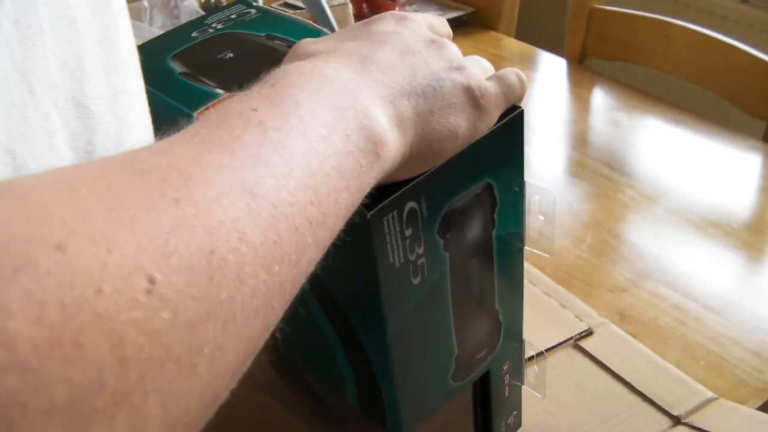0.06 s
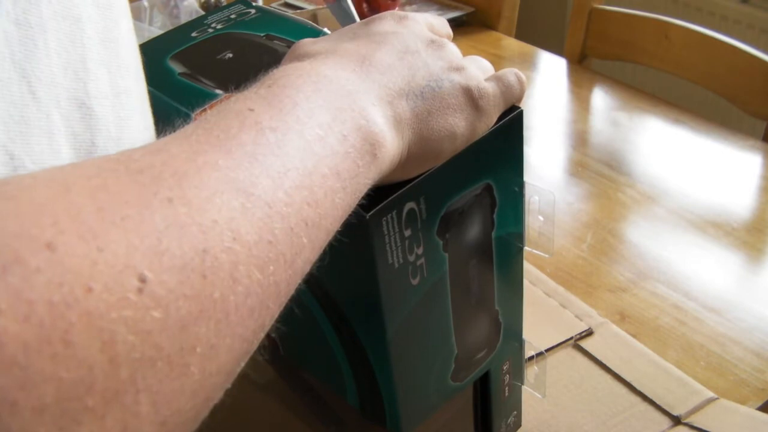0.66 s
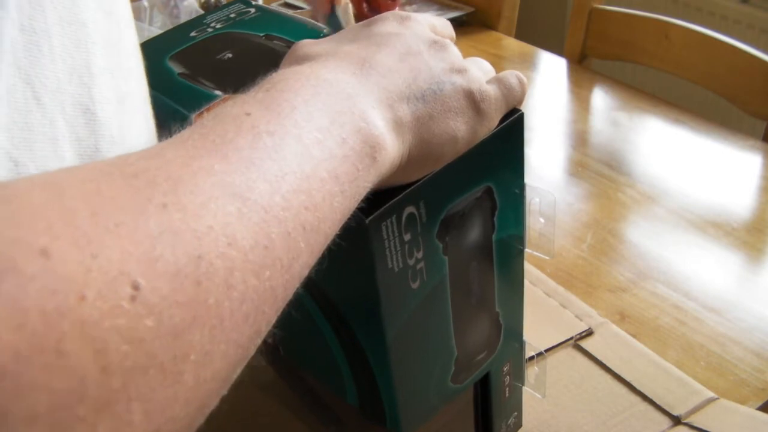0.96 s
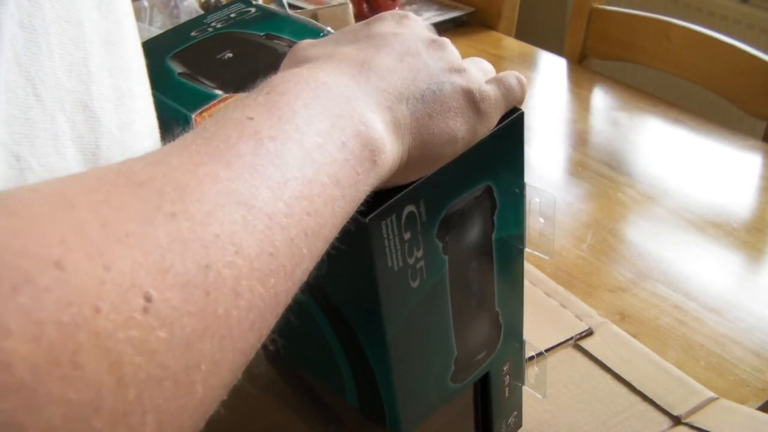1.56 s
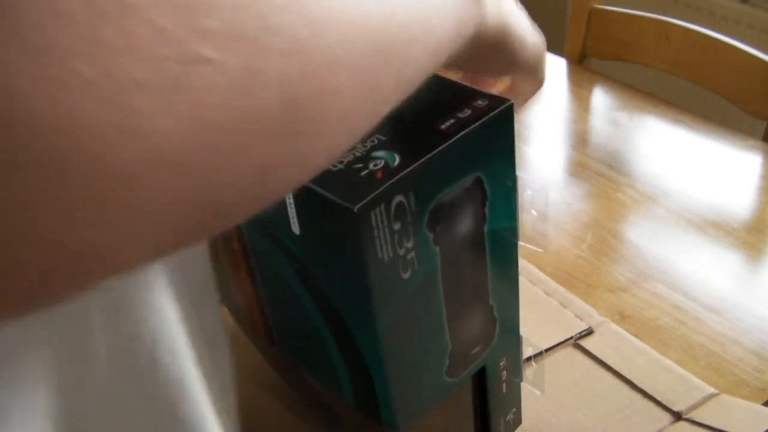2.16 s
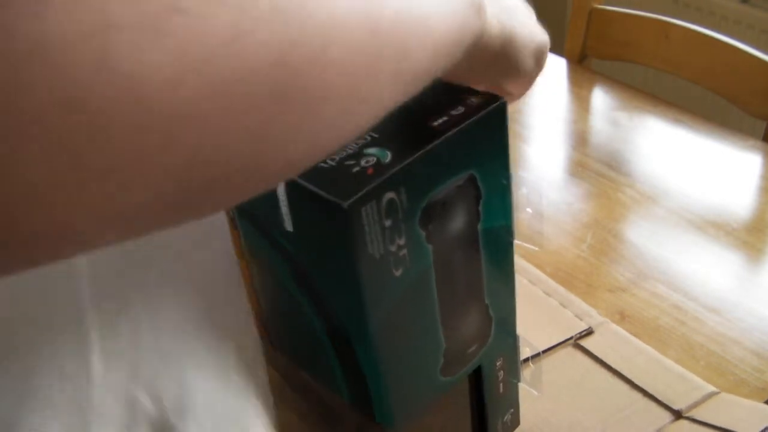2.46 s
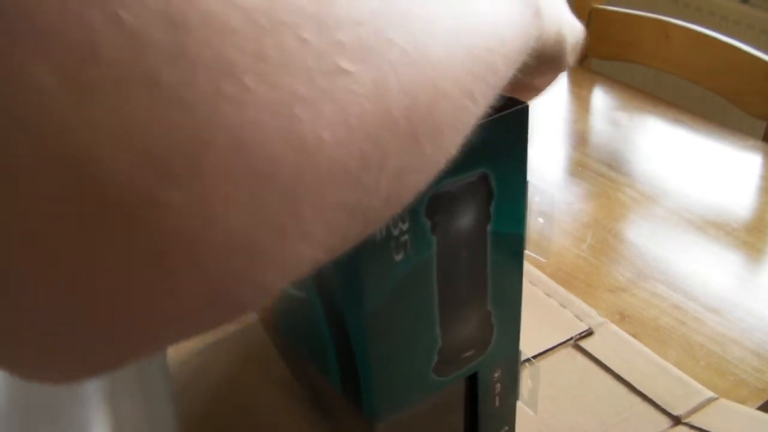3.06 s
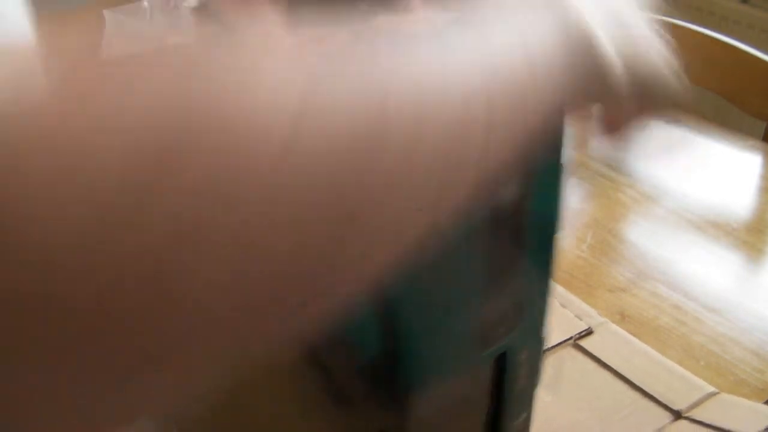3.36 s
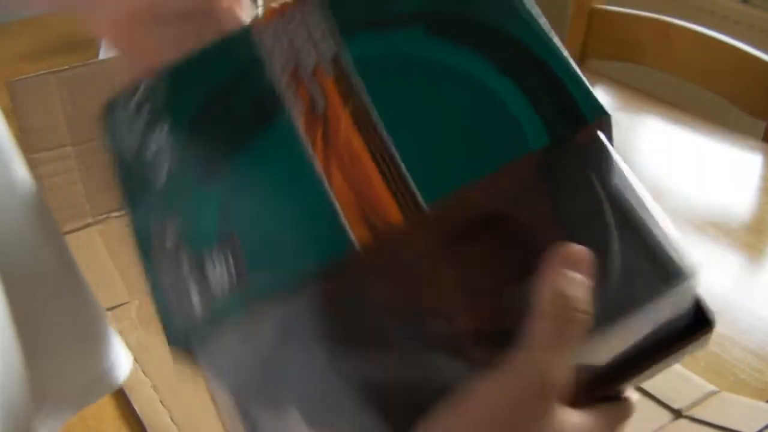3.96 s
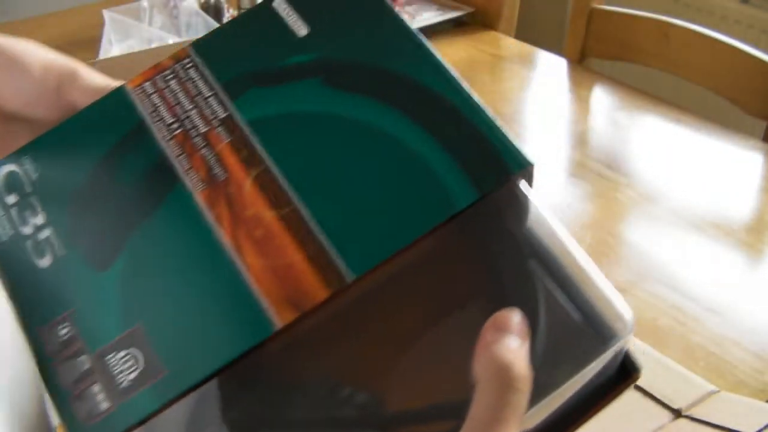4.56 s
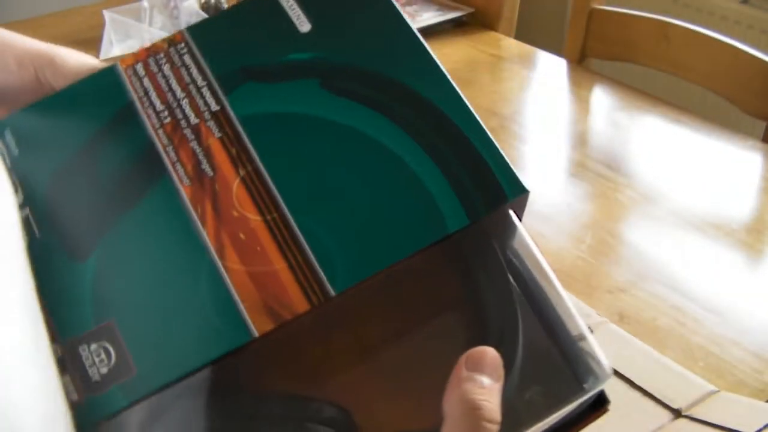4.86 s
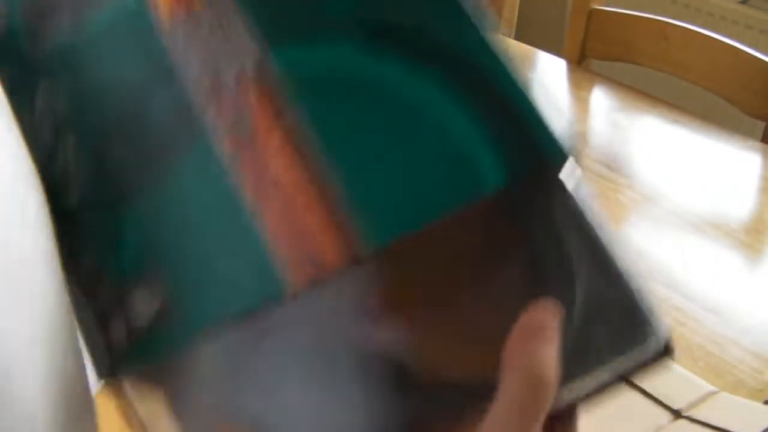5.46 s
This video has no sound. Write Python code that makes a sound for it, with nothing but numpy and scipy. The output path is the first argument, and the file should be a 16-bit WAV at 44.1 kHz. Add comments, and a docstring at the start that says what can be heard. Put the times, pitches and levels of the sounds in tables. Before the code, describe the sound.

A cardboard box with a plastic tray inside is handled close to the microphone in a small, quiet room. It starts with a few faint ticks. At about 0.8 seconds the tray comes loose with a short rasp, followed by soft rubbing and scattered catches of card. Around 2.2 seconds the hollow box knocks hard and thumps on a wooden table, with a quick clatter, a scrape and a sharp plastic snap. A lighter bump comes at 2.9 seconds. From 3 to 4.8 seconds the hands push on in short strokes, the sleeve rubbing with a hollow tone while the plastic clicks and buckles. At about 5 seconds the box knocks hard again, with a bright scrape and a low thump from the table. Two last, softer pushes rub along at about 5.2 and 5.5 seconds.

```python
"""A wooden table in a small room, stereo pair close in: a plastic tray is worked out of its card sleeve.
Light ticks come first; each contact booms the hollow box, claps its panels, cracks its folds and snaps its
edges. Near 0.8 s the tray rasps free, and the hands push on in short strokes, the sleeve rubbing and
catching, the plastic buckling. The box knocks hard and thumps the table around 2.2 s, more lightly at
2.9 s and hard again at 5 s, before two last pushes."""
import sys
import numpy as np
from scipy import signal
from scipy.fft import rfft, irfft, next_fast_len
from scipy.io import wavfile

SR = 44100
rng = np.random.default_rng(int(sys.argv[2]) if len(sys.argv) > 2 else 0)


def log_audio(samples):
    """Write samples as a 16-bit WAV file to the path given in sys.argv[1]."""
    # one column per channel
    frames = np.atleast_2d(samples).T
    # limit to full scale, then quantise
    limited = np.clip(frames, -1, 1)
    pcm = np.round(limited * 32767).astype(np.int16)
    wavfile.write(sys.argv[1], SR, pcm)


N = 243431
TIME = np.arange(N) / SR
# the hands' light, creeping grip between pushes, let go when they shift: t/s, body level/dB
GRIP = [(0.68, -85), (0.79, -54), (1.12, -57.5), (1.25, -53.5), (1.46, -51), (1.56, -59), (1.65, -55),
        (2.9, -50), (3.21, -56.5), (3.55, -49.5), (3.66, -54.5), (3.9, -48), (4.8, -56), (4.88, -50.5),
        (5.5, -49)]


def from_db(db):
    return 10 ** (np.asarray(db) / 20)


def rms(x):
    return np.sqrt(np.mean(x ** 2) + 1e-20)


def in_time(rows):
    """A (t/s, value) curve, sample by sample."""
    return np.interp(TIME, *np.transpose(rows))


def at_hz(rows, hz, column=1):
    """One column of a frequency table, read on a log axis."""
    rows = np.array(rows)
    return np.interp(np.log(np.maximum(hz, 1)), np.log(rows[:, 0]), rows[:, column])


def filtered(x, kind, hz, order=2):
    return signal.sosfilt(signal.butter(order, hz, kind, fs=SR, output="sos"), x)


def coloured(x, spectrum):
    """Gives a signal the colour of a (f/Hz, level/dB) table."""
    return irfft(rfft(x) * from_db(at_hz(spectrum, np.fft.rfftfreq(len(x), 1 / SR))), len(x))


def noise(spectrum):
    """Coloured noise of rms 1."""
    x = coloured(rng.standard_normal(next_fast_len(N)), spectrum)[:N]
    return x / rms(x)


def drift(turns_per_s):
    """Random wander of spread near 1."""
    return np.interp(TIME * turns_per_s, np.arange(N), rng.standard_normal(N))


def resonances(force, modes):
    """Broad resonances in parallel, signs alternating."""
    out = 0
    for k, (hz, width, db) in enumerate(modes):
        r = np.exp(-np.pi * width / SR)
        poles = [1, -2 * r * np.cos(2 * np.pi * hz / SR), r * r]
        gain = (-1) ** k * from_db(db) * (1 - r * r) / 2
        out = out + gain * signal.lfilter([1, 0, -1], poles, force + 1e-18)
    return out


def ring(force, modes, spread_db, detune):
    """Damped modes; the grip and the place of contact weight and shift each one at random."""
    out = 0
    for (hz, db, t60), (weight, shift) in zip(modes, rng.standard_normal((len(modes), 2))):
        r = from_db(-60 / (t60 * SR))
        poles = [1, -2 * r * np.cos(2 * np.pi * hz * (1 + detune * shift) / SR), r * r]
        out = out + from_db(db + spread_db * weight) * signal.lfilter([1, -1], poles, force + 1e-18)
    return out


def room_tone():
    """Still air: a central part, and a diffuse part that differs between the microphones."""
    # spectrum of the air: f/Hz, level per Hz/dB
    air = [(25, -34), (55, -13.5), (100, 3.5), (160, -22), (260, -12), (400, 5), (600, -7.5), (800, -7),
           (1500, -15.5), (4500, -18.5), (12000, -21.5)]
    return from_db(-63) * noise(air), from_db(-67.5) * filtered(noise(air), "low", 4000, order=4)


def thuds(gain):
    """The box shifts on the table in low lumps and is never quite still."""
    # spectrum of the thuds: f/Hz, level per Hz/dB
    spectrum = [(30, -20), (60, -10), (100, -2.5), (145, 0), (190, 6), (240, -17), (330, -20)]
    lumps = from_db(4 + 4 * drift(28))
    return np.hypot(gain, from_db(-73.5)) * lumps * noise(spectrum)


def body(force):
    """The hollow box booms and radiates little outside its modes."""
    # modes of the box: f/Hz, level/dB, t60/s
    modes = [(339.5, -14, 0.1), (368.6, -8.5, 0.13), (402.8, -3.5, 0.34), (418.5, 6, 0.11),
             (454.3, 7, 0.16), (462.3, -21, 0.22), (562, -21.5, 0.16)]
    return filtered(ring(force, modes, spread_db=6, detune=0.02), "band", [210, 950])


def panels(force):
    """Card panels clap in the middle range."""
    # panel resonances: f/Hz, width/Hz, level/dB
    modes = [(690, 56, 1.5), (724, 90, 3), (883, 107, -3), (951, 10.7, -1), (1055, 156, -9.5),
             (1193, 32.5, -1.5), (1288, 274, -9.5)]
    return filtered(resonances(force, modes), "band", [480, 2200])


def folds(force):
    """Stiff, creased card cracks an octave above the panels."""
    # fold resonances: f/Hz, width/Hz, level/dB
    modes = [(1415, 530, -1.5), (2050, 1080, 1), (2450, 256, 7), (2850, 1120, -3.5)]
    return filtered(resonances(force, modes), "band", [1150, 4200])


def edges(force, db_per_octave=0):
    """Small stiff parts radiate only treble."""
    # resonances of edges and plastic film: f/Hz, width/Hz, level/dB
    modes = [(3620, 1040, -0.5), (4190, 1190, 6.5), (6400, 2700, 1.5), (10240, 4300, -3.5)]
    tilted = [(hz, width, db + db_per_octave * np.log2(hz / modes[0][0])) for hz, width, db in modes]
    return filtered(resonances(force, tilted), "high", 2800, order=3)


def contacts(events, trims_db, first_touch, scuff_db, t60_scale, rough_db):
    """Each contact scuffs, hits and chatters away; trims_db sets body, panels, folds and edges."""
    lead, onset = SR // 200, SR // 40
    t = (np.arange(SR // 3) - lead) / SR
    out = np.zeros(N + len(t))
    for s, body_db, panel_db, edge_db, t60 in events:
        at = round(s * SR) - lead
        chatter = from_db(-60 * np.maximum(t, 0) / max(t60 * t60_scale, .004))
        envelope = np.where(t < 0, from_db(scuff_db) * (1 - t / t[0]), chatter)
        tilt = np.clip(-3.5 * (edge_db - panel_db), -6.5, 0)   # edges louder than the panels lose some top
        parts = body, panels, folds, lambda force: edges(force, tilt)
        levels = body_db, panel_db, (panel_db + edge_db) / 2, edge_db
        for part, db, trim_db in zip(parts, levels, trims_db):
            grain, size = rng.standard_normal((2, len(t)))
            force = envelope * grain * from_db(rough_db * size)
            force[lead] += first_touch * np.linalg.norm(force)
            sound = part(force)
            out[at:at + len(t)] += from_db(db + trim_db) * sound / rms(sound[:onset])
    return out[:N]


def ticks(faint_catches):
    """Card and plastic catch lightly: card chatters on, plastic stops short."""
    # the clearest catches, before trims: t/s, body level/dB, panel level/dB, edge level/dB
    clear_catches = [(0.101, -48.5, -62, -68), (0.4031, -48, -56, -64), (0.5756, -47.5, -53, -65.5),
                     (1.1488, -44.5, -45.5, -50), (1.222, -46, -50, -77), (1.2507, -43, -69, -61),
                     (1.382, -39, -52, -54), (1.519, -41.5, -57.5, -60), (1.612, -37, -49, -56.5),
                     (1.675, -34.5, -46, -58), (1.7794, -34.5, -59, -52), (2.464, -29, -37.5, -67),
                     (2.6776, -39.5, -44, -52.5), (2.9847, -47, -48, -51.5), (3.124, -38, -43.5, -45.5),
                     (3.255, -37, -45, -91), (3.3924, -38, -47, -48), (3.412, -61, -48.5, -45),
                     (3.465, -33.5, -45.5, -84), (3.517, -33.5, -37.5, -52.5), (3.7123, -47, -73, -52.5),
                     (3.7618, -35.5, -47, -52.5), (3.784, -34.5, -51, -58), (3.9241, -41, -55, -57),
                     (4.2442, -33.5, -41.5, -38.5), (4.3463, -34, -53, -60), (4.728, -37, -38.5, -52.5),
                     (4.909, -30.5, -61, -58), (4.941, -32, -47, -59), (5.1155, -42, -39, -41),
                     (5.279, -30, -41, -49)]
    events = []
    for s, body_db, panel_db, edge_db in clear_catches:
        t60 = 0.042 * .5 ** ((edge_db - panel_db) / 10)   # halves per 10 dB of edge over panel
        events.append((s, body_db, panel_db, edge_db, t60))
    return contacts(events + faint_catches, trims_db=(-4, -3, -5, -0.5), first_touch=0.55,
                    scuff_db=-11.5, t60_scale=0.81, rough_db=5.5)


def effort(attack_s=0.059, release_s=0.074):
    """Gains of body, panels, edges and thuds: each push swells, holds and relaxes over the light grip."""
    # pushes of the hands: t/s, length/s, body level/dB, edges over body/dB, thuds over body/dB
    pushes = [(0.847, 0.17, -42, -11, -30), (1.658, 0.19, -41.5, -32, -15), (1.99, 0.1, -45.5, -25, -14.5),
              (2.506, 0.24, -44, -17, -20), (2.974, 0.15, -40, -15.5, -24),
              (3.305, 0.23, -41.5, -12.5, -22.5), (3.789, 0.31, -40, -19, -21),
              (4.238, 0.05, -41, -30, -21), (4.427, 0.35, -37, -20.5, -21), (5.142, 0.21, -43, -11.5, -36),
              (5.43, 0.09, -49.5, -16, -11)]
    power = from_db(in_time(GRIP) + np.array([[0], [-7.5], [-16]])) ** 2   # body, edges, thuds
    for s, length, db, edge_db, thud_db in pushes:
        push = np.interp(TIME, [s - attack_s, s, s + length, s + length + release_s], [0, 1, 1, 0])
        power += (from_db(db + np.array([[0], [edge_db], [thud_db]])) * push) ** 2
    body_gain, edge_gain, thud_gain = np.sqrt(power)
    panel_gain = from_db(-5.5) * np.sqrt(body_gain * edge_gain)
    return body_gain, panel_gain, edge_gain, thud_gain


def friction(per_s, size_db, clump_db, hiss):
    """Fibres catch and let go: clumps of tiny clicks over an even hiss; rms 1."""
    sizes = from_db(size_db * np.minimum(rng.exponential(1, N), 4)) * rng.choice([-1, 1], N)
    clicks = sizes * (rng.random(N) < per_s / SR)
    force = (clicks / rms(clicks) + hiss * rng.standard_normal(N)) * from_db(clump_db * drift(70))
    return force / rms(force)


def at_level(sound, gain):
    return gain * sound / rms(sound)


def rasp(force, panel_gain, edge_gain, fold_db):
    """Friction heard through panels, folds and edges."""
    fold_gain = from_db(fold_db) * np.sqrt(panel_gain * edge_gain)
    card = at_level(panels(force), panel_gain) + at_level(folds(force), fold_gain)
    return card + at_level(edges(force), edge_gain)


def rubbing(body_gain, panel_gain, edge_gain):
    """The sleeve sticks and slips under the hands, which damp the box modes into a broad hump."""
    # resonances of the held box: f/Hz, width/Hz, level/dB
    held_modes = [(352.5, 49.2, -2), (418, 62.7, -1), (493, 22.7, -2.5), (570, 39, -12)]
    force = friction(per_s=650, size_db=1, clump_db=3, hiss=0.65)
    stick_slip = from_db(2.4 * drift(45))
    boom = filtered(resonances(force * stick_slip, held_modes), "band", [210, 950])
    return at_level(boom, body_gain) + rasp(force, panel_gain, edge_gain, fold_db=-2)


def catches(body_gain, panel_gain, edge_gain, per_s=9, nominal_t60=0.018):
    """Rows of faint contacts at random once the hands grip, about as strong as the rubbing just then."""
    count = int(per_s * N / SR)
    at = (rng.random(count) * N).astype(int)
    rubbing_db = 20 * np.log10([body_gain[at], panel_gain[at], edge_gain[at]]).T
    levels = rubbing_db + [-2, 3.5, -1] - rng.standard_normal((count, 3))
    return [(i / SR, *db, nominal_t60) for i, db in zip(at, levels) if i / SR > GRIP[0][0]]


def slips():
    """An edge lets go and rasps over the card for a moment; the tray rasps with a ring of its own."""
    # quick slips of an edge: t/s, length/s, panel level/dB, edge level/dB
    strokes = [(0.765, 0.035, -71, -58), (0.795, 0.015, -60, -51), (0.891, 0.041, -48, -48.5),
               (1.473, 0.05, -73, -55.5), (2.168, 0.036, -44.5, -46), (2.335, 0.033, -29.5, -35),
               (2.893, 0.055, -57, -50.5), (3.835, 0.035, -58, -46), (4.222, 0.047, -55, -43),
               (4.45, 0.093, -45, -71), (4.74, 0.045, -41, -55), (4.946, 0.086, -48, -45),
               (5, 0.054, -25.5, -26), (5.222, 0.028, -41, -49), (5.435, 0.039, -46.5, -54)]
    # the tray coming free of the sleeve: t/s, strength/0-1
    freeing = [(.808, 0), (.814, .4), (.822, .4), (.824, 1), (.848, .8), (.862, .15), (.9, 0)]
    # tray resonances: f/Hz, width/Hz, level/dB
    tray_modes = [(397, 42, 15), (1490, 130, -1), (2190, 860, -6.5), (4450, 300, 4.5), (7150, 1300, -5),
                  (8500, 360, 0), (10000, 2000, -5.5)]
    force = friction(per_s=3500, size_db=3.5, clump_db=1.5, hiss=.6)
    panel_gain, edge_gain = np.zeros((2, N))
    for s, length, panel_db, edge_db in strokes:
        stroke = np.interp(TIME, s + length * np.array([0, .06, .8, 1.25]), [0, 1, .8, 0])
        panel_gain += from_db(panel_db) * stroke
        edge_gain += from_db(edge_db) * stroke
    tray = at_level(resonances(force, tray_modes), from_db(-30) * in_time(freeing))
    return rasp(force, panel_gain, edge_gain, fold_db=1.5) + tray


def snaps(split=0.055, t60=0.0045):
    """A buckling wall of the tray rings for a few milliseconds in three close modes."""
    # pitched snaps of the plastic: t/s, f/Hz, level/dB
    buckles = [(1.149, 3800, -54), (1.9464, 3930, -32), (2.332, 1920, -5.5), (3.1242, 3300, -23.5),
               (3.392, 4250, -27), (3.411, 9800, -22), (4.2424, 7400, -14), (4.9892, 2680, -13)]
    t = TIME[:SR // 20]
    out = np.zeros(N + len(t))
    for s, hz, db in buckles:
        modes = hz * (1 + split * (np.arange(-1, 2) + .3 * rng.standard_normal(3)))
        ringing = np.sin(2 * np.pi * np.outer(modes, t)).mean(axis=0) * from_db(-60 * t / t60)
        at = round(s * SR)
        out[at:at + len(t)] += from_db(db) * ringing
    return out[:N]


def table_thumps():
    """The wooden top hums each time the weight of the box lands on it."""
    # bumps on the table: t/s, force level/dB
    bumps = [(1.67, -46), (2.194, -32.5), (2.358, -40), (2.932, -39), (3.084, -48), (3.765, -45),
             (4.616, -43.5), (4.769, -48), (4.99, -30.5), (5.017, -24.5), (5.072, -33)]
    # modes of the table top: f/Hz, level/dB, t60/s
    modes = [(60.6, -14, 0.16), (100, -11, 0.083), (137.5, -3, 0.19), (189, 2.5, 0.17)]
    force = np.zeros(N)
    for s, db in bumps:
        force[round(s * SR)] = from_db(db)
    softened = filtered(force + 1e-18, "low", 320)
    return ring(softened, modes, spread_db=-2, detune=0.0027)


def knocks():
    """Hard blows set the whole hollow box booming and chattering."""
    # blows, before trims: t/s, body level/dB, panel level/dB, edge level/dB, nominal chatter t60/s
    blows = [(2.1922, -9, -18.5, -37, 0.088), (2.205, -15.5, -17.5, -39.5, 0.08),
             (2.222, -17.5, -24, -44, 0.56), (2.281, -22.5, -33, -43, 0.89), (2.33, -24, -34, -31.5, 0.032),
             (2.3585, -11, -19, -53, 0.017), (2.371, -21.5, -22, -46, 0.16),
             (2.9315, -19, -30, -38.5, 0.05), (2.949, -30, -33, -54, 0.017),
             (4.966, -14.5, -25.5, -32.5, 0.65), (4.989, -13.5, -16.5, -21.5, 0.087),
             (5.003, -21, -43, -32, 0.016), (5.019, -12, -17, -36, 0.12),
             (5.074, -19.5, -29.5, -36.5, 0.024), (5.104, -20, -37.5, -34, 0.019)]
    return contacts(blows, trims_db=(-3, -2, -2.1, -1.6), first_touch=0.45,
                    scuff_db=-14, t60_scale=0.72, rough_db=6)


def room(x, first_echo_s=0.00081, build_s=0.0083):
    """The small room's diffuse tail builds up after the first echo and dies band by band."""
    # reverberation: f/Hz, t60/s, level/dB
    reverb = [(100, 0.3, 3.5), (380, 0.52, -11), (915, 0.37, -7.5), (1860, 0.46, -8.5), (4650, 0.42, -10),
              (11000, 0.22, -5.5)]
    t = TIME[:SR * 3 // 4]
    response = np.zeros(len(t))
    limits = np.geomspace(60, 14000, 13)
    build = np.clip((t - first_echo_s) / build_s, 0, 1)
    for low, high in zip(limits, limits[1:]):
        hz = np.sqrt(low * high)
        band = filtered(rng.standard_normal(len(t)), "band", [low, high])
        tail = band * build * from_db(-60 * t / at_hz(reverb, hz, column=1))
        gain = from_db(at_hz(reverb, hz, column=2)) * np.sqrt(2 * (high - low) / SR)
        response += gain * tail / np.linalg.norm(tail)
    return signal.fftconvolve(x, response)[:N]


def stereo_pair(x, scatter_t60=0.012):
    """Two close microphones hear the same, but for a little scatter that shifts as box and arms move."""
    # stereo width: f/Hz, side level over mid/dB
    width = [(80, -27), (220, -20.5), (400, -25), (1000, -16), (2000, -12), (3500, -5.5), (4400, -28),
             (8000, -31), (12000, -22)]
    t = TIME[:SR // 5]
    scatters = rng.standard_normal((3, len(t))) * from_db(-60 * t / scatter_t60)
    shares = np.array([drift(12) for _ in scatters])
    shares /= np.linalg.norm(shares, axis=0)
    side = np.zeros(next_fast_len(N + len(t)))
    for share, scatter in zip(shares, scatters):
        side[:N] += share * signal.fftconvolve(x, scatter / np.linalg.norm(scatter))[:N]
    side = coloured(side, width)[:N]
    return np.array([x + side, x - side]) * from_db([[-.15], [.15]])


def scene():
    """The packaging close to the microphones, with the room and its still air behind."""
    *rub_gains, thud_gain = effort()
    box = knocks() + ticks(catches(*rub_gains)) + snaps()
    box += rubbing(*rub_gains) + slips()
    box += thuds(thud_gain) + table_thumps()
    air, diffuse = room_tone()
    return stereo_pair(box + room(box) + air) + np.array([diffuse, -diffuse])


def record(dry, notch_hz=7900, ceiling=0.92, cutoff_hz=12550):
    """The recorder has one narrow notch, rounds the top peaks and cuts the treble steeply."""
    x = signal.lfilter(*signal.iirnotch(notch_hz, 28, fs=SR), dry)
    x = x / (1 + (x / ceiling) ** 4) ** .25
    return signal.sosfilt(signal.ellip(12, .3, 80, cutoff_hz, fs=SR, output="sos"), x)


dry = scene()
out = record(dry)
log_audio(out)
```